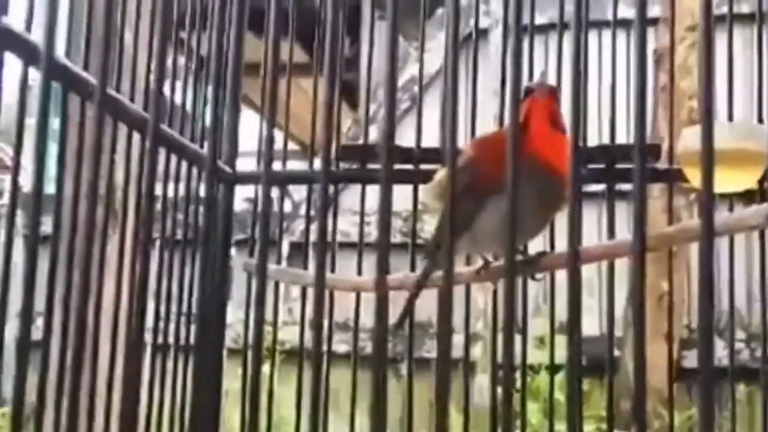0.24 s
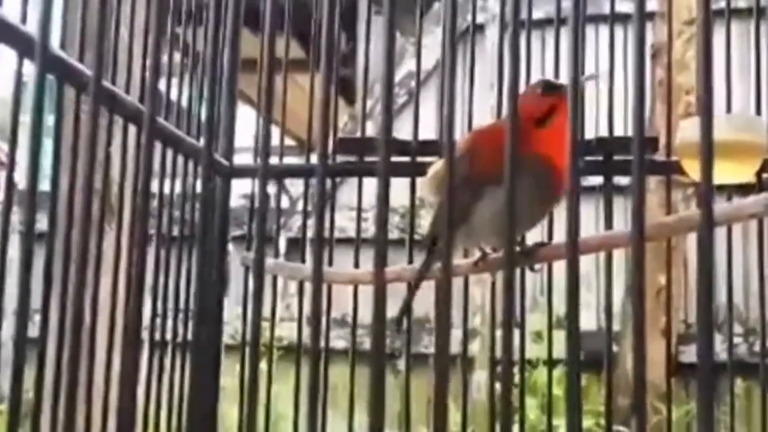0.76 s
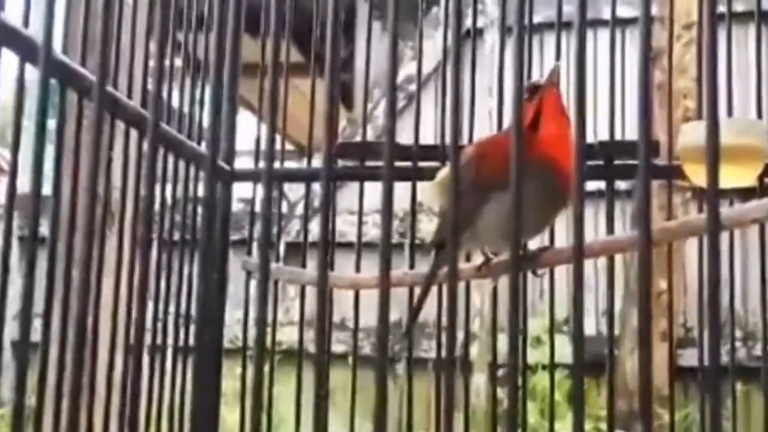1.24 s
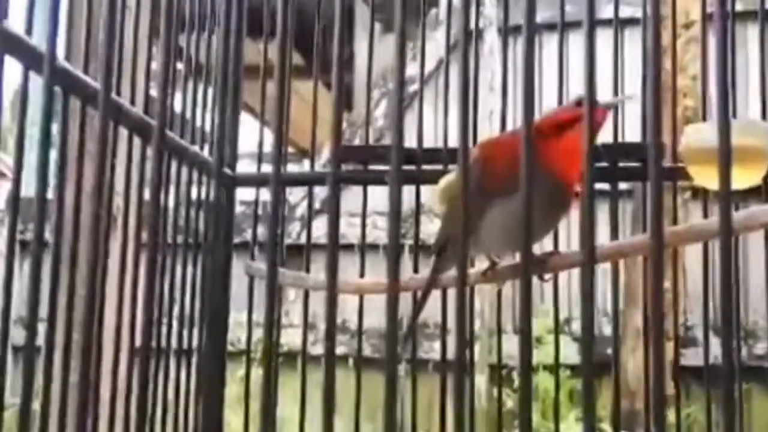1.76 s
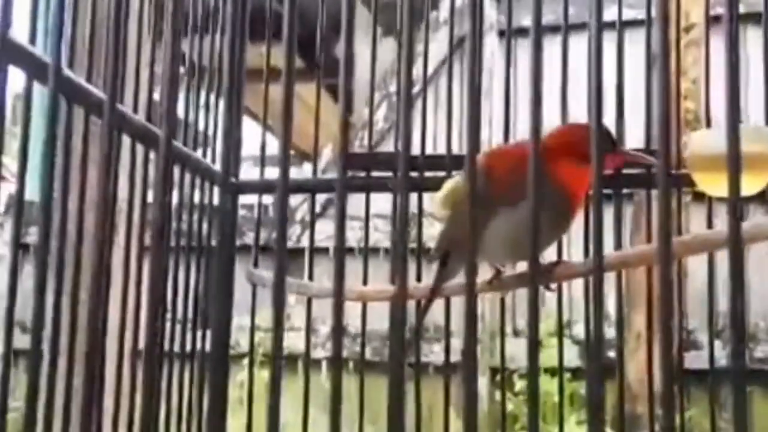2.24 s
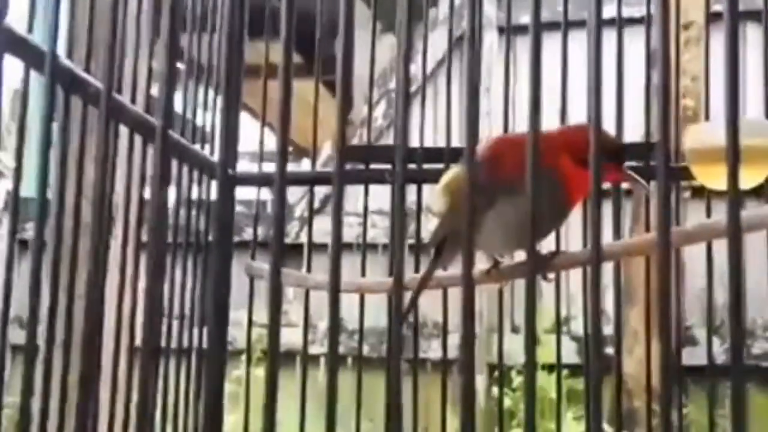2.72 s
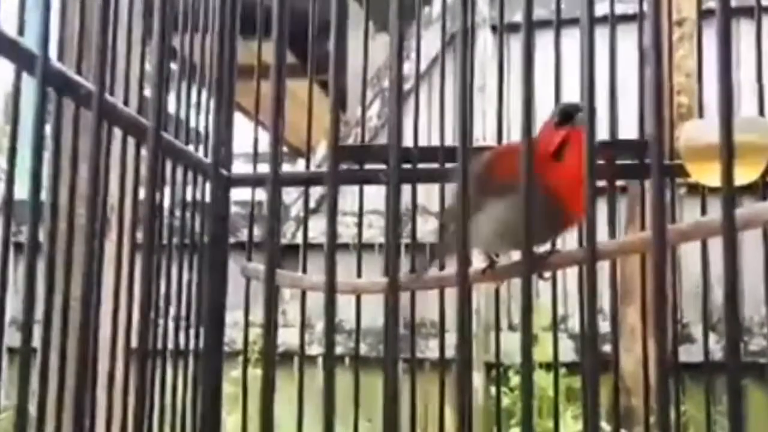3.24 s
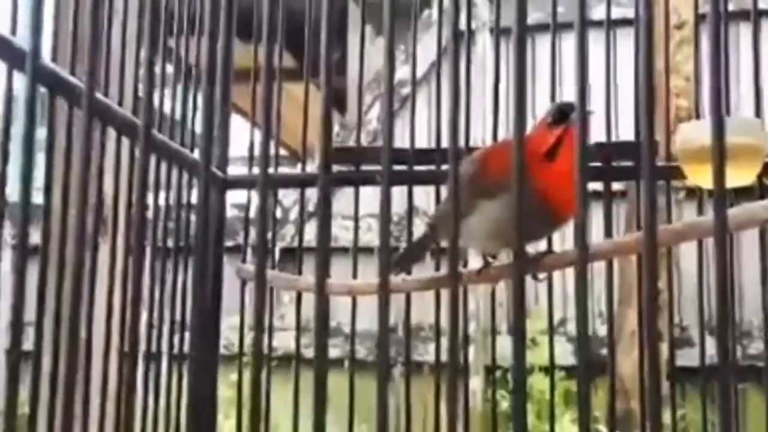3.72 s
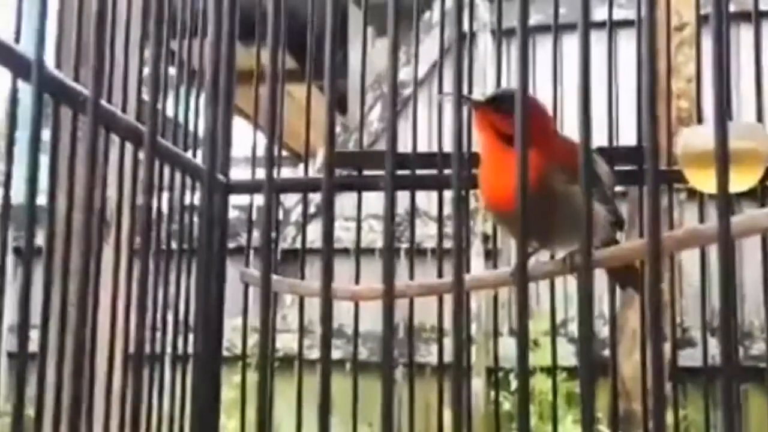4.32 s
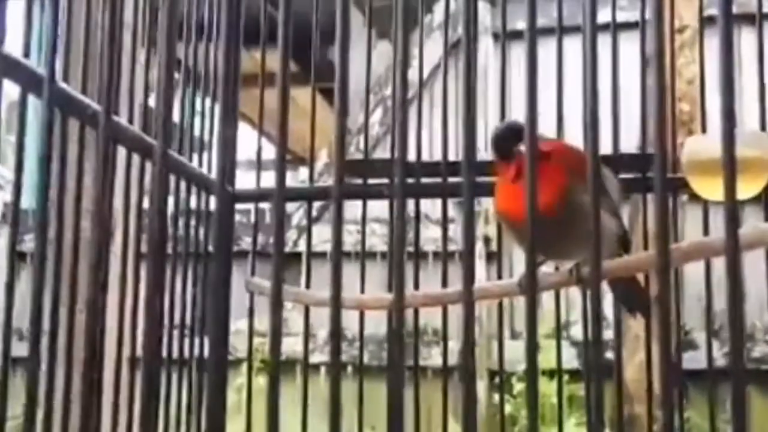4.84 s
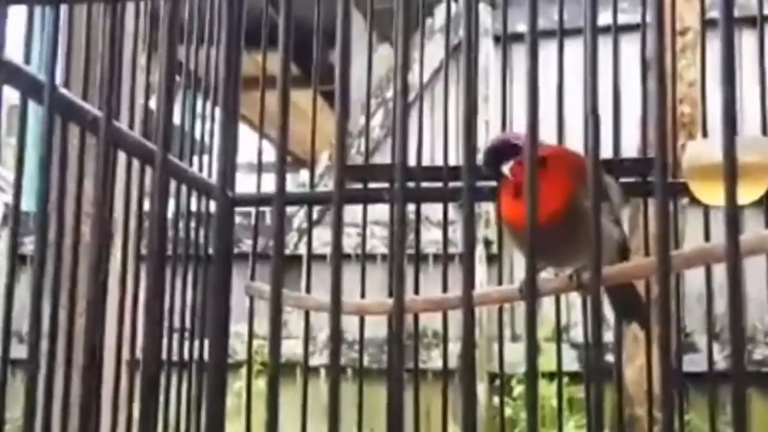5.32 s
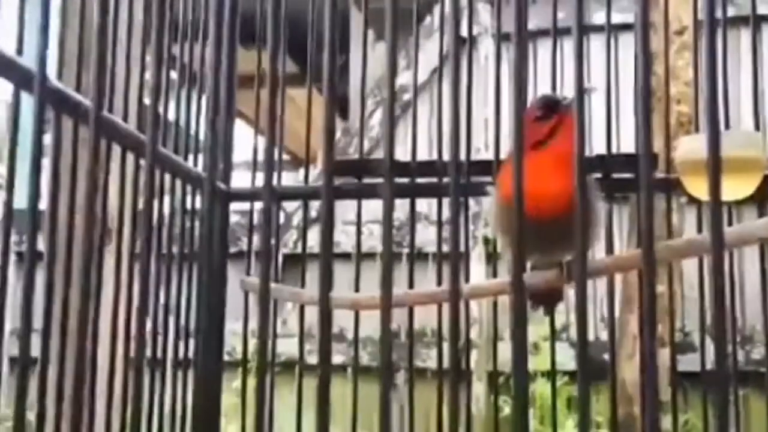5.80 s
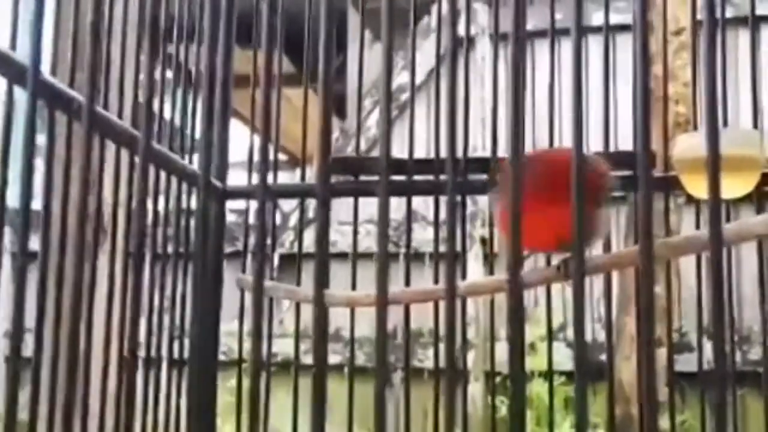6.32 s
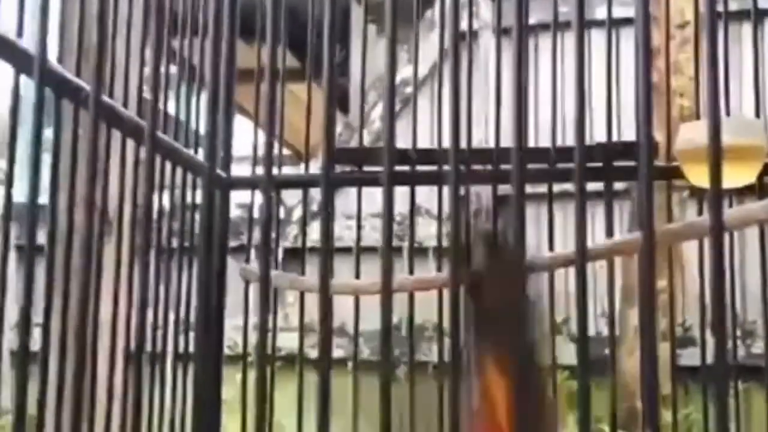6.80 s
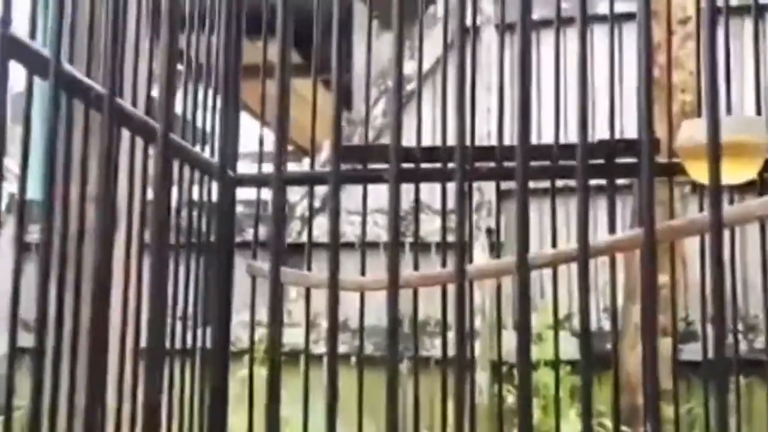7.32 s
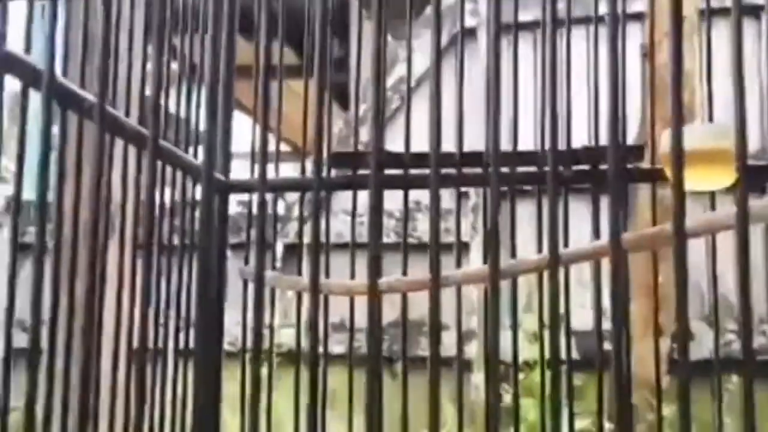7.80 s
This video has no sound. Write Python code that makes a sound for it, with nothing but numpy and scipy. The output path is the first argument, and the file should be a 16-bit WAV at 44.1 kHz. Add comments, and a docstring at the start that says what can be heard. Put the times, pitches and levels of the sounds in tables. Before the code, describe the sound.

A small caged bird twitters in quick bursts of high, raspy, sliding chirps that ring off hard yard walls, over a soft outdoor hush.

```python
"""First and foremost a caged sunbird twitters in a hard-walled yard: quick slurred and raspy gliding whistles,
each drawn out by decaying noise that stands for the echo of the walls.
Behind it lie a few faint far calls (held or buzzing tones), a steady outdoor hush of shaped noise
and a faint low drone of narrow-band noise, loudest at the start.
The recorder's gain control ducks the hush under the phrases."""
import sys
import numpy as np
from scipy import signal
from scipy.fft import rfft, irfft, next_fast_len
from scipy.io import wavfile
from scipy.ndimage import uniform_filter1d, minimum_filter1d, map_coordinates

SR = 44100
rng = np.random.default_rng(int(sys.argv[2]) if len(sys.argv) > 2 else 0)


def materialize(psi):
    """Save the field psi as 16-bit PCM at rate SR to the path in sys.argv[1].

    A 1-D psi becomes a single channel; in a 2-D psi each row is a channel.
    """
    bounded = np.clip(np.atleast_2d(psi).T, -1, 1)
    quanta = np.round(bounded * 32767).astype(np.int16)
    wavfile.write(sys.argv[1], SR, quanta)


N = 355357  # length in samples

# Note levels are set before the song trim, the breath pressure and the microphone colour.
# A tsip is a short scratchy grace note that leaps up to a loud slurred whistle:
# (whistle t/s, length/s, f/Hz, slur/octaves, level/dB, rasp/share of pitch,
#  grace length/s, grace f/Hz, grace level/dB)
TSIP_NOTES = [ (0.581, 0.026, 6430, 0.087, -13, 0.044, 0.018, 5470, -21),
              (0.772, 0.037, 5990, -0.11, -16.5, 0.055, 0.018, 5150, -32.5),
              (0.94, 0.034, 6750, -0.151, -13.5, .045, .014, 5900, -17),
              (1.246, 0.05, 6080, -0.11, -12.5, 0.056, 0.031, 4560, -18.5),
              (1.781, 0.026, 6110, -0.17, -15, .045, .022, 5260, -19.5),
              (2.012, 0.045, 6314, 0.14, -15, .06, 0.015, 5170, -26),
              (2.397, .055, 5694, -0.224, -14.5, 0.065, .019, 5100, -20.5),
              (3.638, 0.0323, 6440, 0.148, -14.5, 0.049, 0.0077, 5480, -21.5),
              (5.738, 0.06, 6107, -0.07, -15.5, 0.044, 0.0081, 4700, -32),
              (5.96, 0.0251, 6050, -0.061, -10, 0.036, 0.018, 4890, -22), ]
GRACE_OCTAVES, GRACE_RASP = 0.076, 0.066  # slur and flutter of the grace note
# A churr is a bending buzz: (t/s, length/s, f/Hz, slur/octaves, rasp/share of pitch, level/dB)
CHURR_NOTES = [(1.164, 0.029, 5650, -0.18, 0.13, -20), (1.494, 0.0604, 5550, -.06, 0.086, -24),
               (4.242, 0.02, 5530, -0.083, 0.15, -25), (4.264, .02, 5410, -0.108, 0.11, -19),
               (4.45, .016, 5360, -0.031, 0.084, -22.5), (4.472, 0.025, 5550, -0.037, 0.096, -13.5),
               (4.61, .03, 5620, -0.15, 0.054, -23.5)]
# Faint companions of the churr: pitch ratio and level against the buzz
UNDERTONE_RATIO, UNDERTONE_DB = 0.53, -22.5
OVERTONE_RATIO, OVERTONE_DB = 1.3, -31
# A chip is a hoarse slurred note, most often sagging:
# (t/s, length/s, f/Hz, slur/octaves, level/dB, rasp/share of pitch)
CHIP_NOTES = [ (0.054, 0.022, 5520, -0.076, -18, 0.013), (0.129, .03, 5586, -0.067, -16, 0.067),
              (0.9, 0.063, 4710, -0.0089, -35.5, 0.098), (1.478, 0.0275, 5450, -0.095, -20, .05),
              (1.592, 0.033, 4630, -0.065, -22.5, 0.06), (2.206, 0.014, 7280, -0.2, -26, 0.032),
              (2.227, 0.019, 6520, -0.089, -13.5, 0.05), (4.299, 0.0408, 4980, -0.12, -22.5, 0.037),
              (4.365, 0.036, 4830, -0.049, -28.5, 0.028), (4.430, .016, 5570, -0.095, -18, 0.095),
              (4.548, 0.045, 4630, 0.044, -24, 0.034), (4.644, 0.051, 5370, 0.136, -19.5, 0.029),
              (4.66, 0.042, 2950, .2, -44, 0.1), (5.741, 0.044, 4866, -0.023, -23, 0.059),
              (6.074, 0.049, 5680, -0.1, -17.5, 0.086), (6.078, 0.037, 3910, -0.091, -33, .045),
              (6.085, 0.026, 3250, -0.26, -49, 0.043), (6.352, 0.044, 6030, -0.204, -17.5, 0.038),
              (6.395, 0.0482, 5400, -0.117, -21.5, 0.076), (6.453, .022, 5535, -0.073, -16.5, 0.042),
              (6.478, .05, 5180, -0.09, -22.5, 0.074), ]
# A scratch is a harsh burst, always around one pitch: (t/s, length/s, level/dB)
SCRATCH_NOTES = [(0.000, 0.0074, -17.5), (0.038, 0.025, -18.5), (0.07, 0.022, -15.5), (0.098, 0.02, -21),
                 (1.213, 0.039, -18), (1.799, 0.016, -24.5), (5.762, 0.047, -25)]
SCRATCH_HZ, SCRATCH_RASP = 5720, 0.19
# A peep is a thin, nearly pure and level note: (t/s, length/s, f/Hz, level/dB)
PEEP_NOTES = [ (0.932, 0.0095, 7900, -33), (0.996, 0.006, 7200, -33), (1.499, 0.0066, 5290, -19),
              (1.8, 0.0093, 7330, -27), (4.215, 0.018, 5080, -38.5), (4.464, 0.038, 6660, -32),
              (4.622, 0.039, 6660, -31), (5.713, 0.007, 5940, -43), (5.941, 0.014, 6530, -17),
              (6.012, 0.035, 6030, -23.5), (6.14, 0.012, 7930, -34), (6.142, 0.067, 7220, -23.5),
              (6.146, 0.012, 6300, -21.5), (6.18, 0.027, 6657, -12), ]
PEEP_RASP = 0.022
# A whip is a clean upward sweep, most often closing a churr:
# (t/s, length/s, middle f/Hz, rise/octaves, level/dB)
WHIP_NOTES = [(1.173, 0.03, 4040, 0.5, -27.5), (1.562, 0.031, 4090, 0.35, -27),
              (2.357, 0.043, 4620, 0.092, -31), (4.252, .014, 4180, 0.19, -35),
              (4.279, 0.026, 3990, 0.16, -30.5), (4.504, 0.02, 4100, 0.37, -23),
              (4.703, 0.027, 4180, 0.28, -23), (6.45, 0.018, 4270, 0.15, -30)]
SCOOP_OCTAVES, SCOOP_S = 0.041, 0.0038  # every sunbird note slides up into its pitch
NOTE_EDGE, WHIP_EDGE = 0.2, 0.42  # rise and fall as a share of the length; whips swell more softly
# Treble colour of the song at the microphone: (f/Hz, level/dB)
MICROPHONE_RESPONSE = [(6800, 0), (7400, 2.5), (8200, 6), (9000, -18.5), (11000, -45.5)]
# Time the yard's late tail takes to fall by 60 dB: (f/Hz, decay time/s)
YARD_DECAY = [(2000, 0.94), (4500, 0.88), (7000, 0.77), (10000, 0.57)]
# Other birds far off: (t/s, length/s, f/Hz, level/dB, rasp/share of pitch)
FAR_BIRD_CALLS = [(0.18, 0.69, 2380, -59.5, 0.014), (2.24, 0.67, 2344, -59, 0.011),
                  (3.147, 0.061, 4720, -49, 0.16), (4.347, 0.46, 2320, -59, 0.01),
                  (6.244, 0.45, 2390, -58, 0.01)]
# Relative spectrum of the outdoor hush: (f/Hz, level per Hz/dB)
HUSH_SPECTRUM = [(25, -44.5), (55, -38.5), (100, -17), (220, -18.5), (400, -13), (600, -11), (900, -8),
                 (1180, -9), (1450, -4.5), (2000, -4.5), (2900, -7), (3500, -9), (5200, -13.5),
                 (6500, -8.5), (7000, -22.5), (7800, -31), (9300, -17), (10300, -31)]
# Humps on the hush spectrum: (f/Hz, width/Hz, height/dB)
HUSH_HUMPS = [(129, 82, 6.5), (363, 24, 6), (580, 220, 7), (1317, 67, 3.5), (1668, 285, 6), (2260, 74, 1),
              (5870, 630, 9.5)]
# Loudness of the hush over time: (t/s, level/dB)
HUSH_LOUDNESS = [(0, -45.5), (3.9, -44.5), (4.4, -45), (6.25, -43.5), (7.0, -45)]
# Loudness of the drone over time: (t/s, level/dB)
DRONE_LOUDNESS = [(0, -65), (0.9, -67), (1.8, -68), (2.799, -75), (8.06, -76.5)]
TOP_HZ = 10700  # the recorder passes nothing above this


def amp(db):
    """Decibels to gain."""
    return 10 ** (np.asarray(db) / 20)


def unit(x):
    """Scale to rms 1."""
    return x / np.sqrt(np.mean(x ** 2) + 1e-20)


def along_hz(points, hz):
    """Join (f/Hz, value) points on a log frequency axis."""
    f, v = np.transpose(points)
    return np.interp(np.log(hz + 1), np.log(f + 1), v)


def along_time(points):
    """Join (t/s, value) points into a curve over the whole scene."""
    return np.interp(np.arange(N) / SR, *np.transpose(points))


def wobble(rate, size):
    """A smooth random curve, rate knots a second."""
    knots = rng.standard_normal(int(size * rate / SR) + 4)
    return map_coordinates(knots, [np.arange(size) * rate / SR])


def filtered(x, response):
    """Shape the spectrum of x by a gain that depends on frequency."""
    padded = next_fast_len(N + SR // 2)
    spectrum = rfft(x, padded) * response(np.fft.rfftfreq(padded, 1 / SR))
    return irfft(spectrum, padded)[..., :N]


def add(track, s, sound):
    """Mix a sound into the track at s seconds."""
    start = max(0, round(s * SR))
    part = sound[:len(track) - start]
    track[start:start + len(part)] += part


def swell(t, length, edge):
    """A rounded rise and fall, each edge seconds long."""
    nearest_end = np.minimum(t, length - t)
    return np.sin(np.pi / 2 * np.clip(nearest_end / edge, 0, 1)) ** 2


def sunbird(song_db=-2.5, direct_db=3.0, beaming_db=8.0, effort_db=12):
    """Each note is one short gliding whistle that rings on in the yard."""
    song = np.zeros(N)
    t = np.arange(SR // 10) / SR
    for s, length, hz, slur, db, rasp in notes():
        glide = slur * (np.minimum(t / length, 1) - 0.5)
        octaves = glide - SCOOP_OCTAVES * np.exp(-t / SCOOP_S)
        # more breath lifts pitch and level together (effort in dB per octave)
        pressure = amp(effort_db * octaves)
        edge = length * (NOTE_EDGE if rasp else WHIP_EDGE)
        tone = whistle(hz * 2 ** octaves, rasp)
        note = amp(db + song_db) * pressure * tone * swell(t, length, edge)
        # the beak beams high notes past the microphone, so they arrive mostly as echo (dB per octave)
        note_direct_db = direct_db - beaming_db * np.log2(hz / 4200)
        add(song, s, yard(note, note_direct_db))
    return filtered(song, lambda hz: amp(along_hz(MICROPHONE_RESPONSE, hz)))


def notes():
    """Spell out the syllables as notes: (t/s, length/s, f/Hz, slur/octaves, level/dB, rasp/share)."""
    for s, length, hz, slur, db, rasp, grace_s, grace_hz, grace_db in TSIP_NOTES:
        yield s - grace_s, grace_s, grace_hz, GRACE_OCTAVES, grace_db, GRACE_RASP
        yield s, length, hz, slur, db, rasp
    for s, length, hz, slur, rasp, db in CHURR_NOTES:
        yield s, length, hz, slur, db, rasp
        yield s, length, UNDERTONE_RATIO * hz, slur, db + UNDERTONE_DB, rasp
        yield s, length, OVERTONE_RATIO * hz, slur, db + OVERTONE_DB, rasp
    for s, length, hz, rise, db in WHIP_NOTES:
        yield s, length, hz, rise, db, 0
    yield from CHIP_NOTES
    for s, length, db in SCRATCH_NOTES:
        yield s, length, SCRATCH_HZ, 0, db, SCRATCH_RASP
    for s, length, hz, db in PEEP_NOTES:
        yield s, length, hz, 0, db, PEEP_RASP


def whistle(pitch, rasp, flutter_hz=270, flutter_scatter=0.182, jitter=0.23):
    """A pure tone on a pitch curve; a fast uneven flutter of the syrinx makes it rasp (a share of the pitch)."""
    size = len(pitch)
    rate = flutter_hz * (1 + flutter_scatter * wobble(147.3, size))
    beats = np.cumsum(rate) / SR + rng.random()
    flutter = np.sin(2 * np.pi * beats) + jitter * wobble(1208.0, size)
    cycles = np.cumsum(pitch * (1 + rasp * flutter)) / SR
    return np.sin(2 * np.pi * cycles)


def yard(sound, direct_db, early_db=2.5, early_t60=0.45, late_db=-1, build=0.0068):
    """Direct sound, a quick flurry from the near walls and the yard's long tail, drawn anew for each note."""
    hz, frames_s, late_bands = signal.stft(rng.standard_normal(SR), SR, nperseg=256)
    decay = amp(-60 * frames_s / along_hz(YARD_DECAY, hz)[:, None])
    late = signal.istft(late_bands * decay, SR, nperseg=256)[1][:SR]
    t = np.arange(SR) / SR
    early = rng.standard_normal(SR) * amp(-60 * t / early_t60)
    echo = (amp(early_db) * unit(early) + amp(late_db) * unit(late)) / np.sqrt(SR)
    echo *= np.minimum(t / build, 1)  # the echo takes a few milliseconds to build
    echo[0] = amp(direct_db)
    return signal.fftconvolve(sound, echo)


def far_birds():
    """Thin held whistles and short chirps from far off, blurred by the walls."""
    calls = np.zeros(N)
    t = np.arange(SR) / SR
    for s, length, hz, db, rasp in FAR_BIRD_CALLS:
        # held whistles flutter at 20 Hz, short chirps buzz
        tone = whistle(np.full(SR, hz), rasp, flutter_hz=20 if length > 0.2 else 300)
        call = amp(db) * tone * swell(t, length, length / 4)
        add(calls, s, yard(call, direct_db=5.0))
    return calls


def hush(patchy_db=1.5, drift_db=0.5, ripple_db=2.0, ripple_step_hz=28):
    """Outdoor noise with a few resonances, shifting a little in patches of time and frequency."""
    bands = signal.stft(rng.standard_normal(N), nperseg=512)[2]
    patches = uniform_filter1d(rng.standard_normal(bands.shape), 6, 0)
    patches = uniform_filter1d(patches, 18, 1)
    noise = signal.istft(bands * amp(patchy_db * unit(patches)), nperseg=512)[1][:N]
    comb = rng.standard_normal(SR // 2)

    def colour(hz):
        """Broad spectrum, resonant humps and the fine ripple that reflections between the walls leave."""
        humps = sum(db / (1 + (2 * (hz - centre) / width) ** 2) for centre, width, db in HUSH_HUMPS)
        ripple = ripple_db * map_coordinates(comb, [hz / ripple_step_hz]) * np.minimum(hz / 600, 1)
        return amp(along_hz(HUSH_SPECTRUM, hz) + humps + ripple)

    level_db = along_time(HUSH_LOUDNESS) + drift_db * wobble(11.0, N)
    return unit(filtered(noise, colour)) * amp(level_db)


def drone(centre_hz=335, width_hz=45):
    """A faint low drone far off, narrow-band noise that fades in the first seconds."""
    noise = rng.standard_normal(N)
    hum = unit(filtered(noise, lambda hz: 1 / (1 + ((hz - centre_hz) / width_hz) ** 2)))
    return hum * amp(along_time(DRONE_LOUDNESS))


def scene(hush_side_db=-23, song_side_db=-29):
    """Everything is heard near the centre, with a trace of width."""
    birds = sunbird() + far_birds()
    scatter = rng.standard_normal(SR // 100)
    spread = signal.fftconvolve(birds, scatter / np.linalg.norm(scatter))[:N]
    mid = birds + hush() + drone()
    side = amp(song_side_db) * spread + amp(hush_side_db) * hush()
    return np.array([mid + side, mid - side])


def gain_control(x, ceiling_db=-28.0, sense=0.005, ahead=0.013, ease=0.013, memory=0.057,
                 trend_db=3.0, release_db_per_s=260):
    """Looks ahead and cuts what passes the ceiling, harder on a rising level; the gain then climbs back steadily."""
    def samples(seconds):
        return max(1, int(seconds * SR))

    power = uniform_filter1d(np.mean(x ** 2, axis=0), samples(sense))
    level_db = 10 * np.log10(np.abs(power) + 1e-12)
    before_db = np.pad(level_db, (samples(memory), 0), mode="edge")[:N]
    trend = np.tanh((level_db - before_db) / 5)  # towards +1 when rising, -1 when falling
    needed_db = np.minimum(0, ceiling_db - level_db - trend_db * trend)
    held_db = minimum_filter1d(needed_db, samples(2 * ahead))
    # a running minimum against a steady climb limits how fast the gain recovers
    climb_db = release_db_per_s * np.arange(N) / SR
    gain_db = np.minimum.accumulate(held_db - climb_db) + climb_db
    return x * amp(uniform_filter1d(gain_db, samples(ease)))


def record(dry):
    """Gain control, then the recorder's band limit."""
    return filtered(gain_control(dry), lambda hz: hz < TOP_HZ)


dry = scene()
out = record(dry)
materialize(out)
```